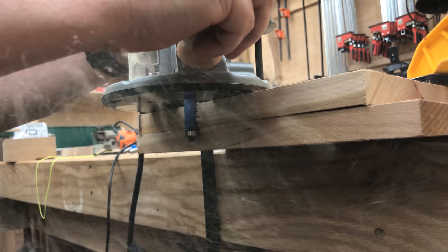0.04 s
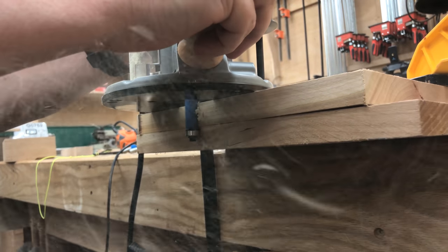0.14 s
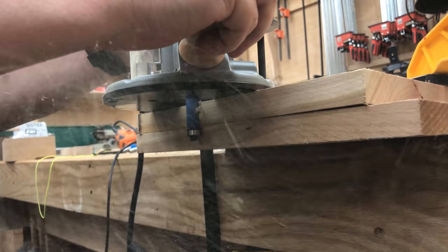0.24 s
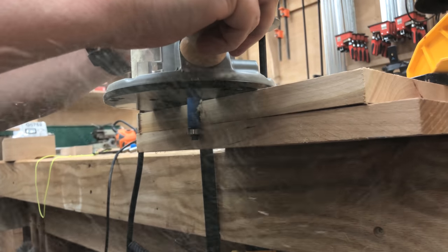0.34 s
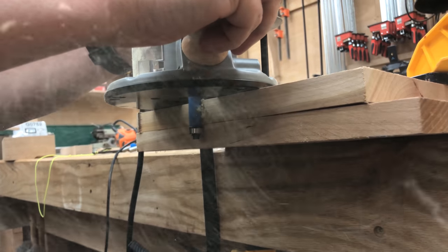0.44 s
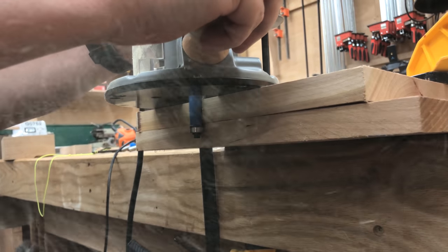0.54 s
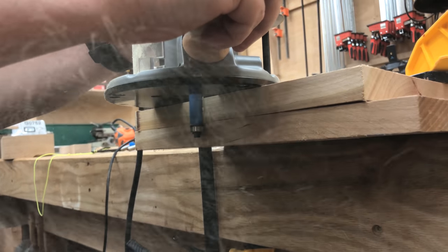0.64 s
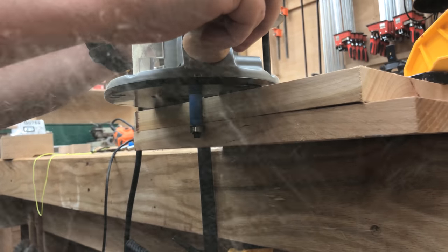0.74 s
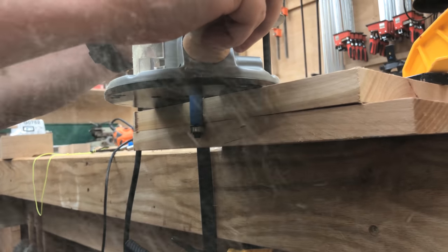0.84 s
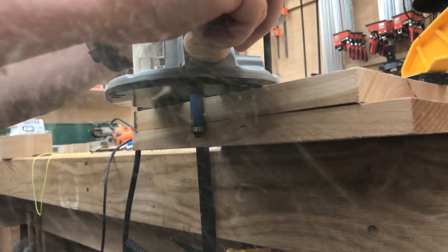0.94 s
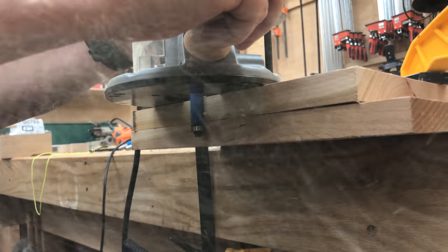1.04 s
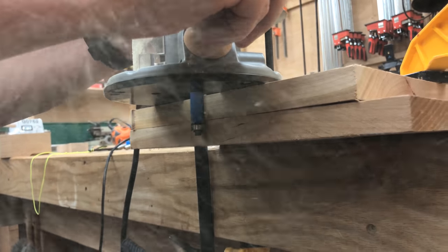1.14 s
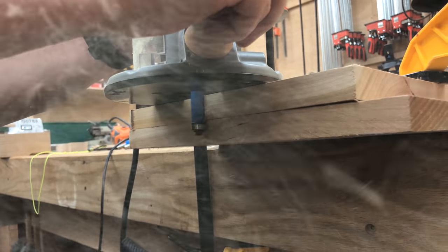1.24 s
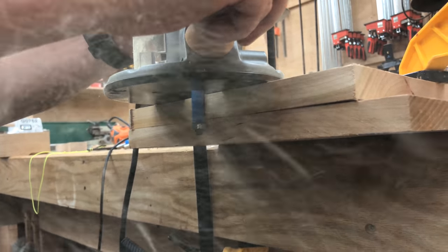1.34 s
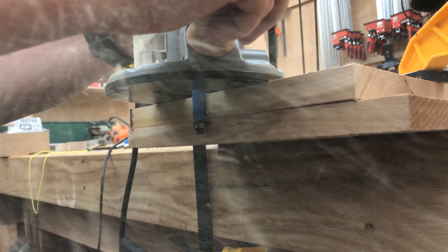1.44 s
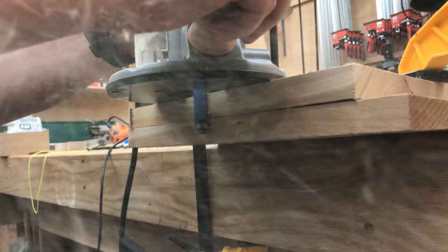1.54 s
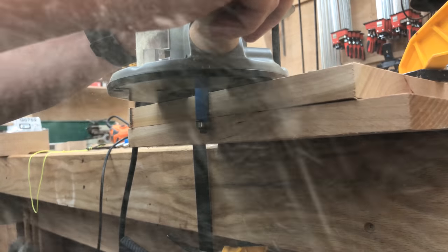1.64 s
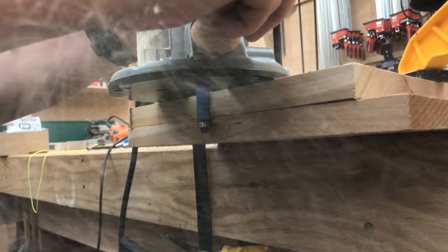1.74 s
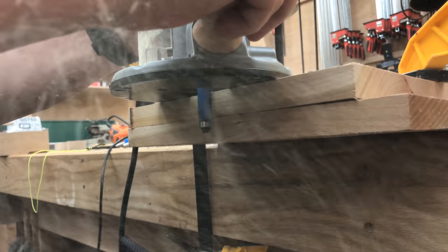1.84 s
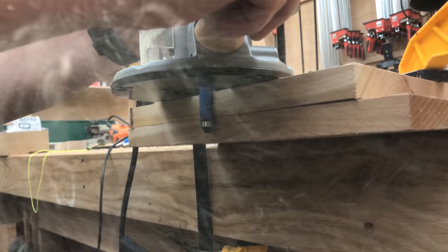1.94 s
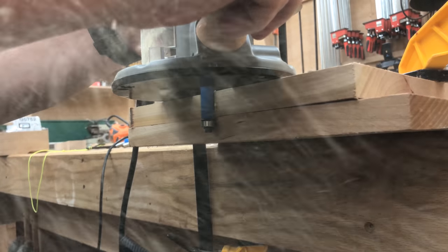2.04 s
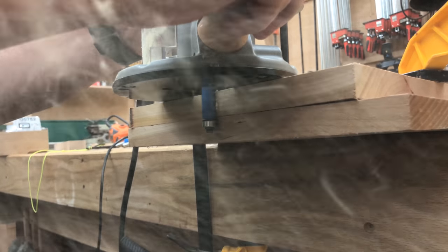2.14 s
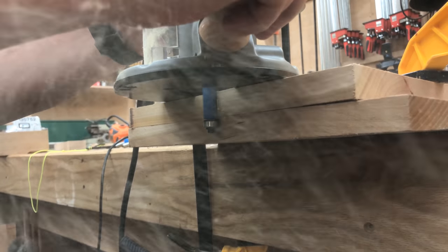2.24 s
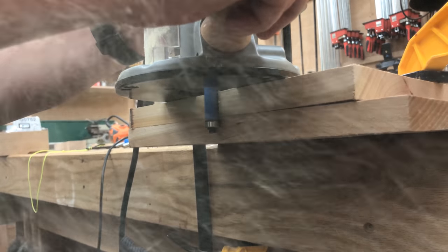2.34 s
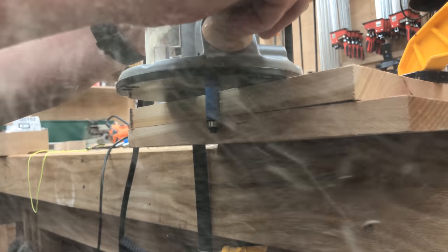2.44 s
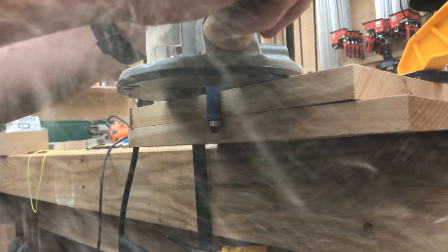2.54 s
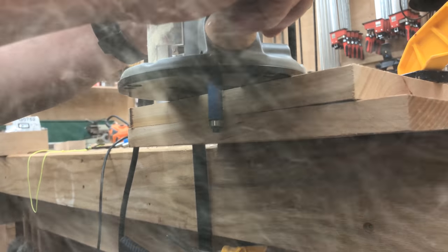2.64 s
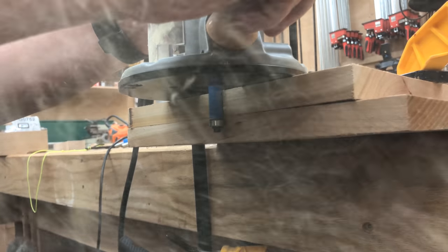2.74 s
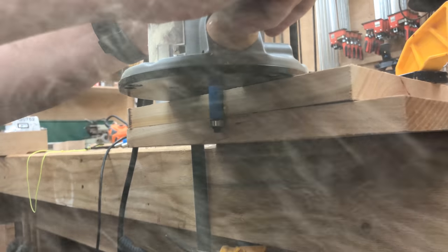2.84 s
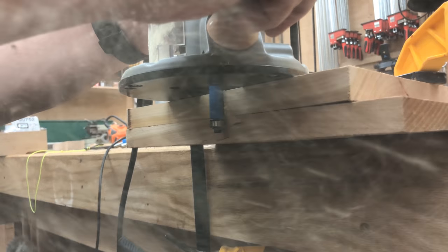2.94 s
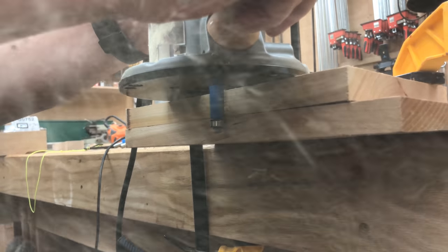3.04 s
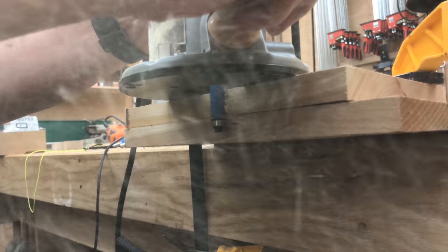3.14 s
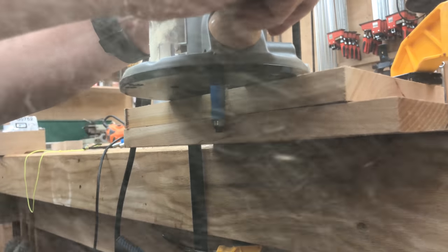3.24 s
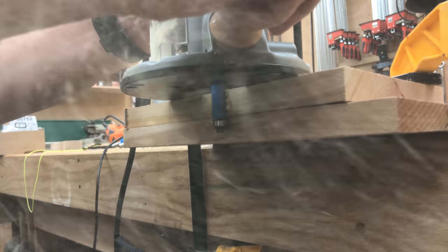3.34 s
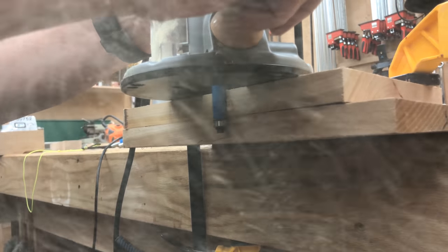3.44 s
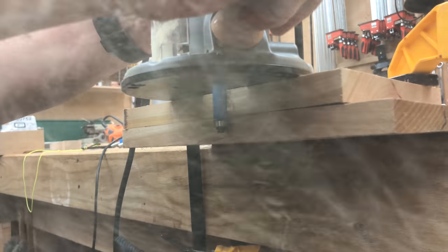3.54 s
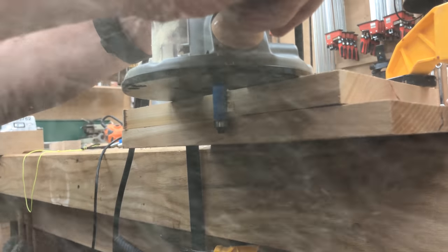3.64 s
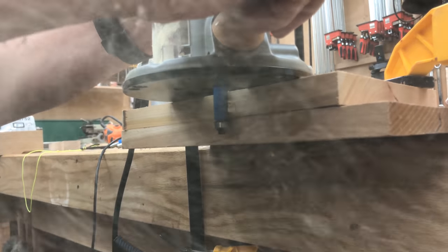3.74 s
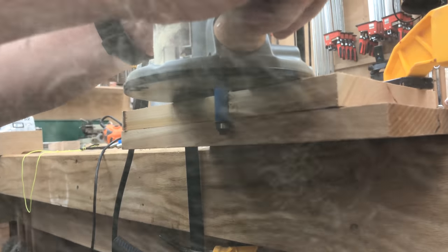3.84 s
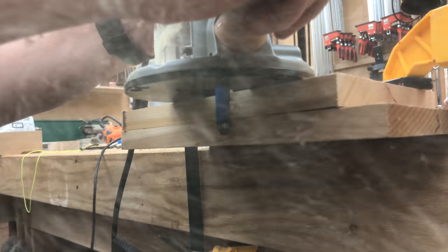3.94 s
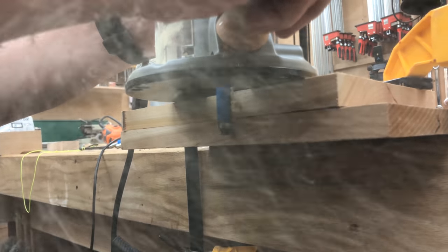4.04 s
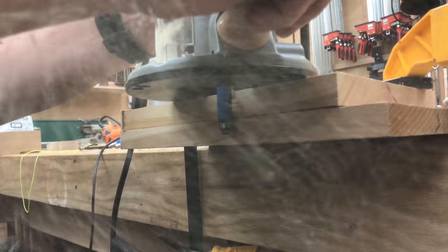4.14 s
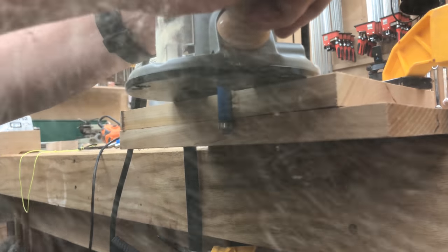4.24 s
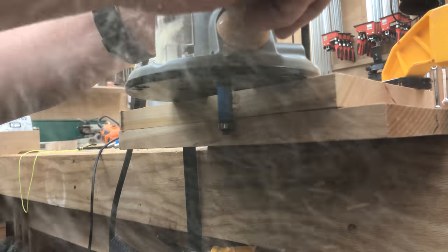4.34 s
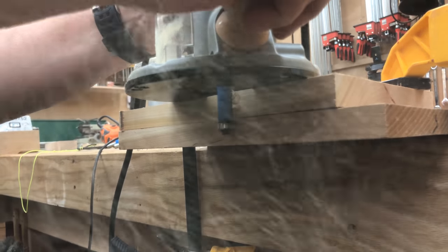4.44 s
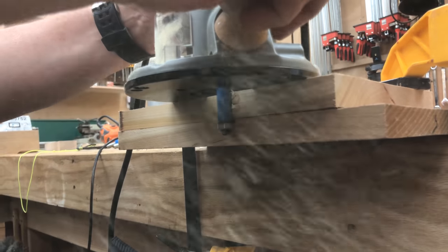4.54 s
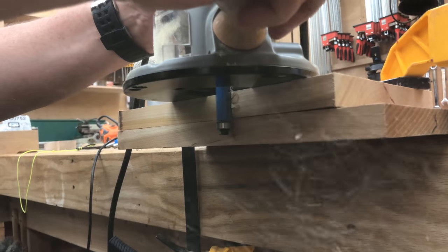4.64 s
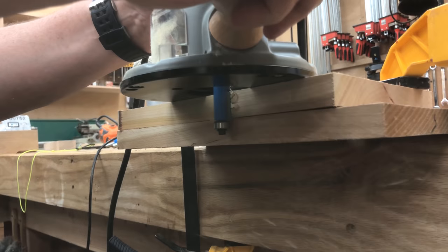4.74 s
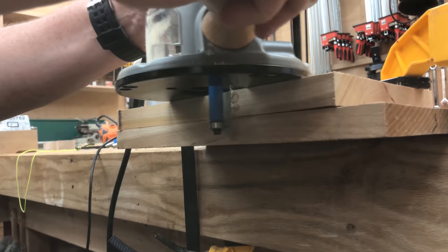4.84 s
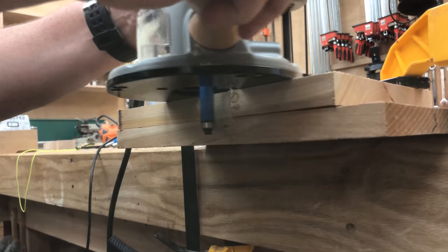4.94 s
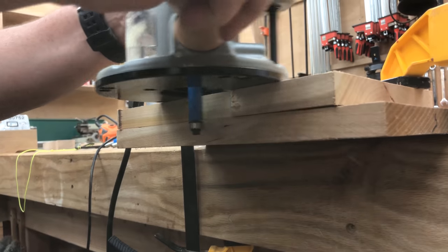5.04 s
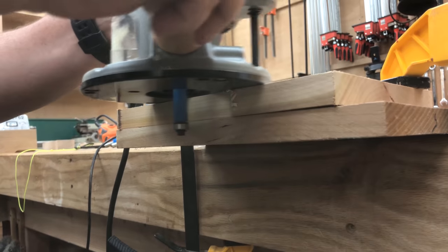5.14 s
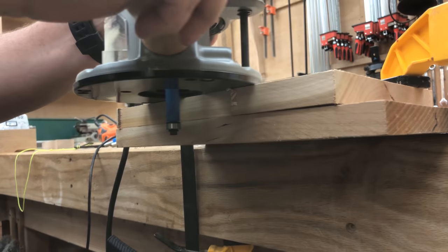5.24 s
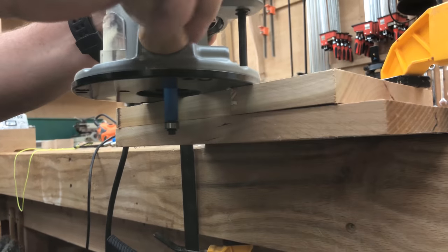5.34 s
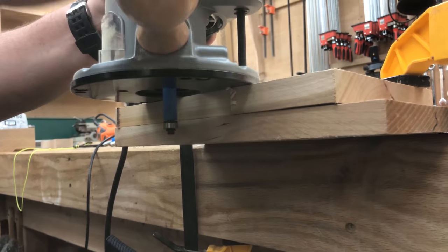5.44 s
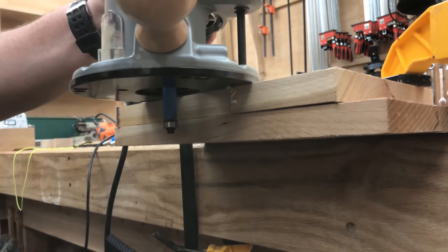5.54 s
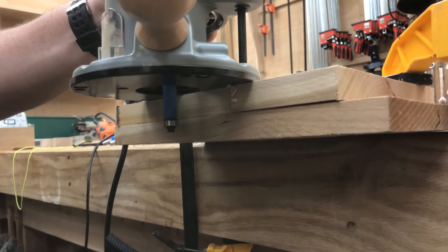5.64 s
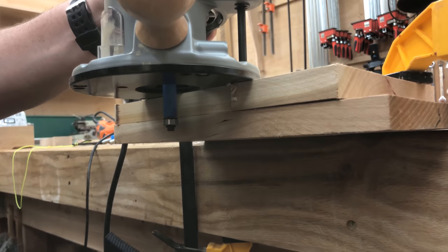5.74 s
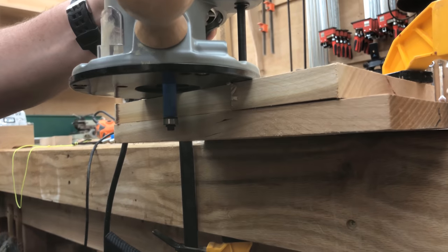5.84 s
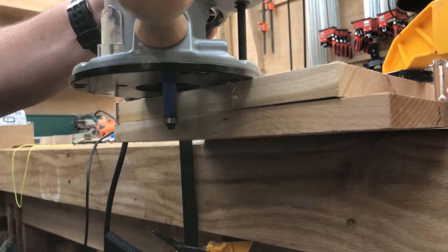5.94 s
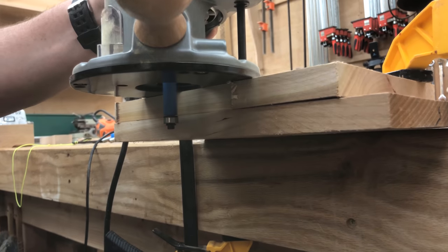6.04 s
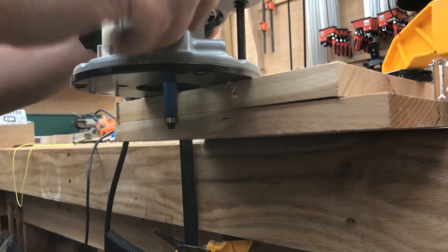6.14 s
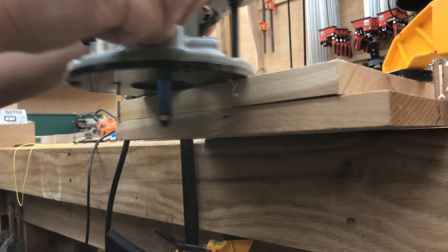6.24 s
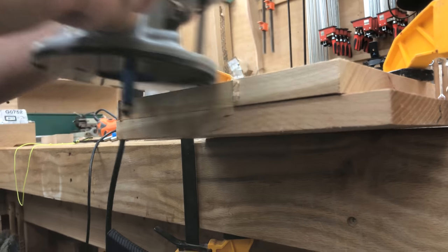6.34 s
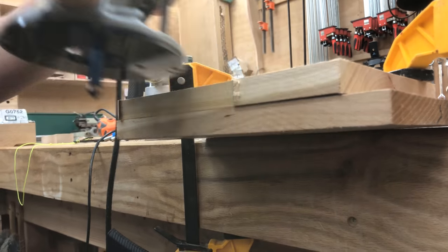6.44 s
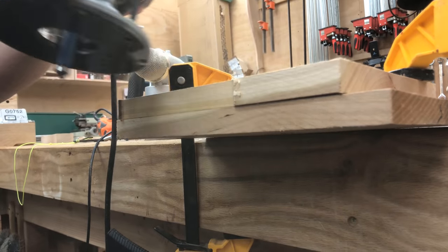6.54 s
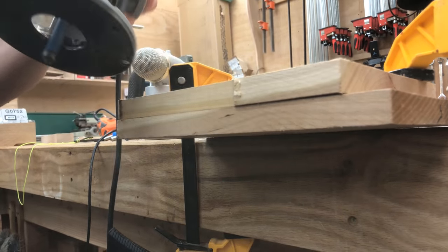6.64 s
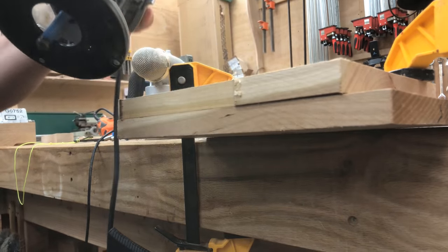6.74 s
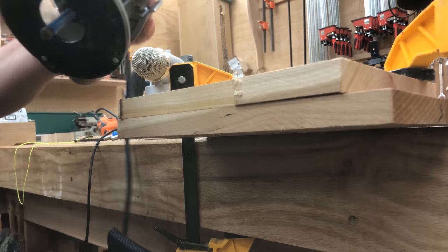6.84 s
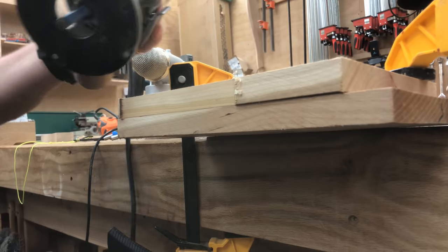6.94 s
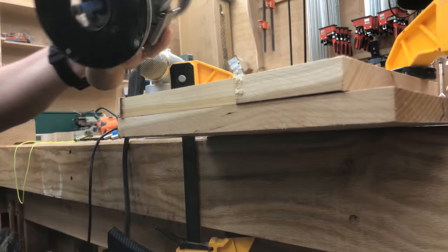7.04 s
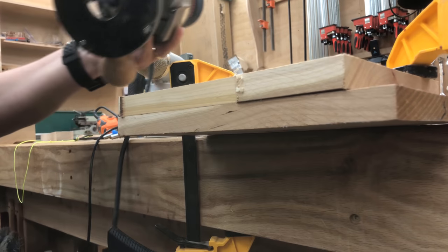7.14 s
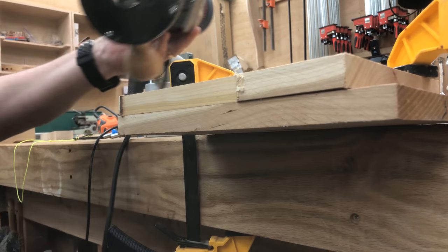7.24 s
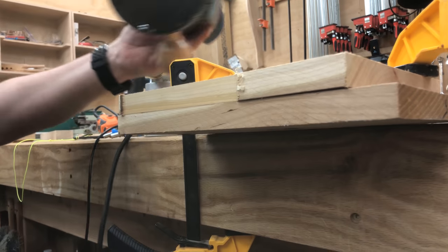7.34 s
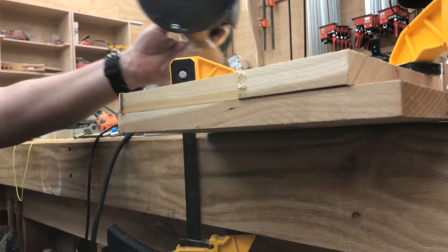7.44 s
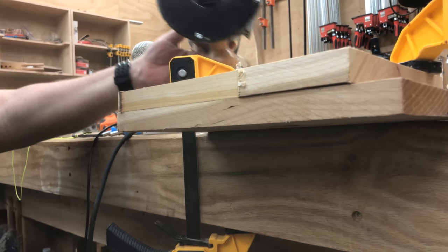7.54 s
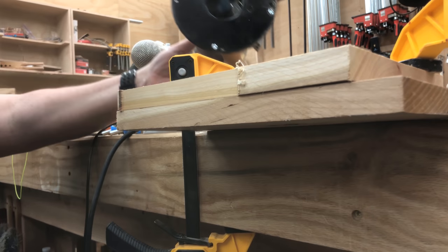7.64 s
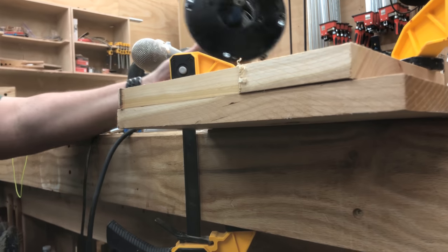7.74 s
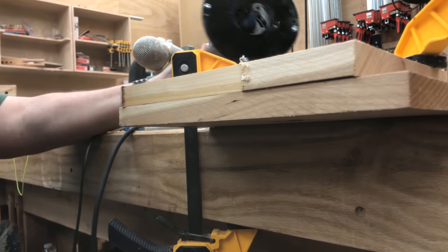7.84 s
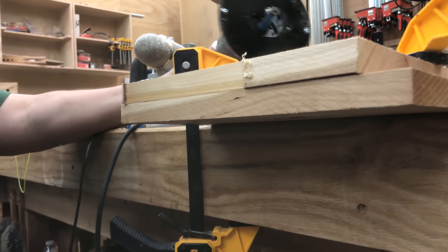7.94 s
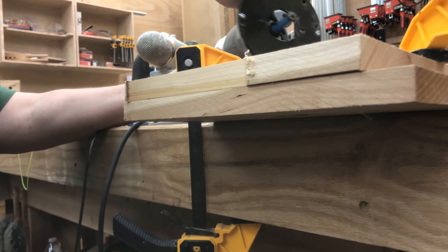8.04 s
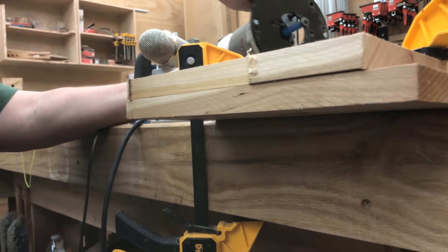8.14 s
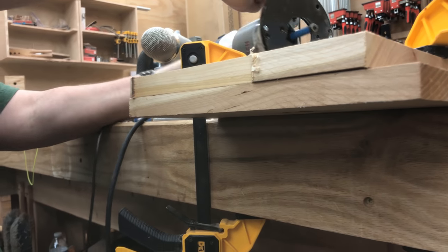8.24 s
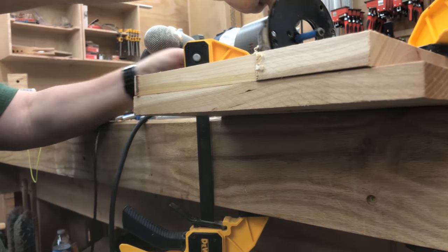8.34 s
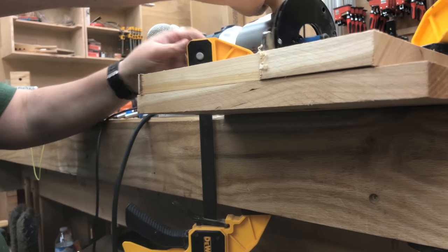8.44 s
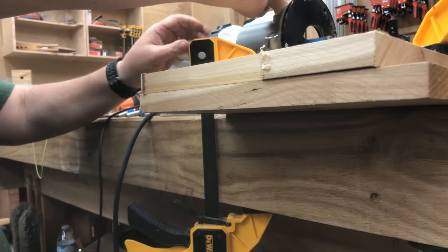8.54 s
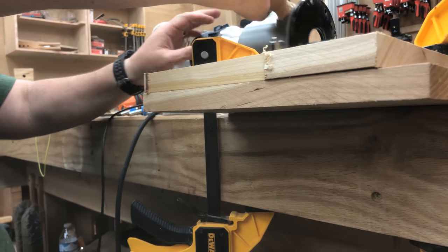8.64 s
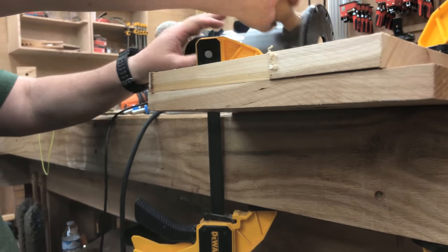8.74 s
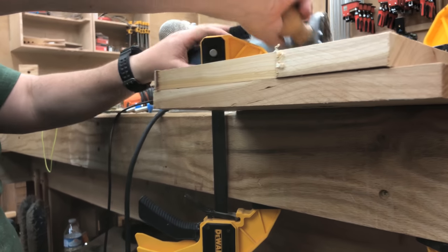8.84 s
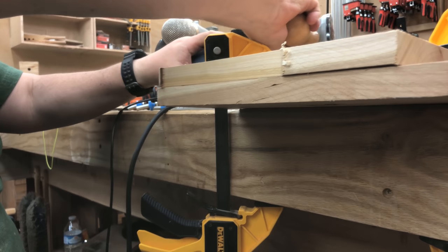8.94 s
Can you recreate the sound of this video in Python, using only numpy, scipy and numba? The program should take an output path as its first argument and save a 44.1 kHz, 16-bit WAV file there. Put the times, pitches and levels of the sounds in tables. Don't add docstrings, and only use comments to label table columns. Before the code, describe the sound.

In a workshop, a router trims a board edge very close to a single overloaded microphone: a steady, harsh, gritty buzz-whine with roaring air. The pitch lifts slightly as the bit leaves the wood and the tone smooths out. Switched off, it glides downward while hollow resonances shift as the tool is turned, then small taps and a firmer wooden knock as it is laid on the bench.

```python
import sys
import numpy as np
from scipy import signal
from scipy.fft import rfft, irfft, next_fast_len
from scipy.io import wavfile
from scipy.ndimage import uniform_filter1d
from numba import njit

SR = 44100
rng = np.random.default_rng(int(sys.argv[2]) if len(sys.argv) > 2 else 0)


def nominal_scale(level):
    x = np.asarray(level, float) / 20
    return 10 ** x


def dump_mix(stems):
    frames = np.atleast_2d(stems).T
    limited = np.clip(frames, -1, 1)
    pcm = np.round(limited * 32767).astype(np.int16)
    wavfile.write(sys.argv[1], SR, pcm)


N = 396439
TIME_S = np.arange(N) / SR
CUT_EASES_S, OUT_OF_WOOD_S, FREE_S, SWITCH_OFF_S, LIFT_OFF_S = 3.93, 4.52, 4.96, 5.741, 6.32


def curves(table):
    time_s, *columns = np.transpose(table)
    return [np.interp(TIME_S, time_s, column) for column in columns]


def walk(rate_hz):
    hold = int(SR / rate_hz)
    steps = np.repeat(rng.standard_normal(N // hold + 1), hold)
    slewed = uniform_filter1d(uniform_filter1d(steps, hold), hold)
    return 1.294 * slewed[:N]


def swell(start_s, end_s):
    progress = np.clip((TIME_S - start_s) / (end_s - start_s), 0, 1)
    return np.abs(np.sin(np.pi * progress))


def noise(shape):
    freq_hz, shape_db = np.transpose(shape)
    size = next_fast_len(N)
    bin_hz = np.arange(size // 2 + 1) * SR / size
    gain = nominal_scale(np.interp(np.log(bin_hz + 1), np.log(freq_hz), shape_db))
    x = irfft(rfft(rng.standard_normal(size)) * gain, size)[:N]
    return x / np.std(x)


@njit
def band(x, center_hz, width):
    y, b, l = np.empty(len(x)), 0., 0.
    for i in range(len(x)):
        g = np.tan(np.pi * center_hz[i] / SR)
        v = (b + g * (x[i] - l)) / (1 + g * (g + width))
        b, l, y[i] = 2 * v - b, l + 2 * g * v, width * v
    return y


def hiss(center_hz, width):
    once = band(rng.standard_normal(N), center_hz, width)
    twice = band(once, center_hz, width)
    return twice / np.std(twice)


# time_s, speed_hz
SPEED = [(0, 420.4), (.6, 422.6), (1.2, 422), (1.5, 423.6), (1.8, 423.6), (2.1, 426.3), (3, 425.3),
         (3.3, 424), (3.6, 424.7), (3.9, 425.5), (4.35, 430), (4.65, 438.8), (4.8, 439.2), (5.4, 434.6),
         (5.74, 434)]


def shaft_hz():
    equal_drag_hz, drag_per_s = 283.2, .1028
    driven_hz, = curves(SPEED)
    off_s = np.maximum(TIME_S - SWITCH_OFF_S, 0)
    return equal_drag_hz * np.tan(np.arctan(driven_hz / equal_drag_hz) - drag_per_s * off_s)


PARTIAL_STAGES = {"unbalance": (-32, -30, -27.5, -32.5, -56.5), "flutes": (-25, -25.5, -47, -34.5, -47),
                  "fan": (-38, -48, -44, -44, -49), "balls": (-40.5, -39, -28.5, -27, -38.5),
                  "balls+2": (-45, -53, -48, -50.5, -45.5), "balls+4": (-55, -53, -55, -58, -55.5),
                  "balls+1": (-52, -52, -48, -51, -49), "x3": (-24, -22, -34, -39.5, -56),
                  "x4": (-39.5, -36, -40, -44, -52.5), "x5": (-43, -36.5, -37, -47, -58),
                  "x6": (-31, -39.5, -52, -49, -57), "x8": (-33, -35, -49, -56, -60)}
AIR_STAGES = {"rumble": (-46, -46, -46, -45.5, -49), "roar": (-29, -32.5, -28, -27, -28),
              "fizz": (-34, -35, -31, -30, -31), "vent": (-28, -33.5, -28.5, -30, -35.5)}
RESONATING = {"unbalance": [(-.3, .3, 5.5), (.6, 1.3, 1.5), (5.2, 5.8, 2), (5.8, 6.55, 6), (7, 8, 6.5)],
              "flutes": [(1.3, 1.7, 2), (6.1, 6.8, 4), (.7, 1.1, 2), (5.7, 6.1, 12.5), (7.2, 7.85, -4),
              (7.5, 9.4, 15.5), (8.6, 8.97, 7)], "fan": [(2.6, 3.25, 11), (3.95, 4.3, 7), (4.35, 5.2, 13),
              (5.3, 6.2, 5), (6.35, 6.95, 17), (6.9, 7.45, 11), (7.9, 8.7, 6)], "balls": [(-.3, .9, 3),
              (1.3, 2, 4), (4, 4.7, 5), (5.35, 6.15, 4.5), (6.2, 6.6, 4), (6.5, 7.2, 6), (7, 7.4, 5),
              (8.5, 8.95, 3.5)], "balls+2": [(.2, 1.5, 7), (3, 4.1, 5), (5.8, 6.6, 12), (7, 7.4, 9),
              (7.5, 8.2, 12.5), (8, 8.85, 17.5)], "balls+4": [(5.8, 6.2, 10), (8.4, 8.9, 24.5)],
              "balls+1": [(4.5, 4.8, 12), (7.2, 7.9, 12), (8, 8.6, 9)]}
GRAIN = {"x3": [(-.3, .3, -4), (4.2, 4.6, 3), (2, 3.4, 1), (5.8, 6.35, -9), (6.25, 6.7, 8),
         (6.8, 7.6, 10.5), (8, 8.4, 12)], "x4": [(-.3, .3, 13), (.4, 1.5, -12), (6.25, 7, 11),
         (8, 9.1, 16)], "x5": [(.7, 1.6, 5), (2, 4.7, 7.5), (5.5, 6.4, 4.5)], "x6": [(.7, 1.9, -17),
         (1.5, 1.9, -8), (2.6, 3.6, -9), (3.8, 4.6, -10), (6.2, 6.6, 11)], "x8": [(.1, .4, 2),
         (1.1, 1.7, -9), (2.1, 3.2, 0.5), (3.1, 3.8, -12), (3.9, 4.5, -9), (6.8, 7.2, 14)]}
SHADING = {"rumble": [(2.1, 2.7, 3), (8.2, 9.3, 12.5)], "roar": [(2.2, 3.6, 2), (4.35, 4.8, 2),
           (4.8, 5.7, -2), (5.75, 6.1, -2), (6.8, 7.1, 2), (7.8, 8.1, -2)], "fizz": [(1.9, 3.6, -0.5),
           (5.8, 6.5, -2), (6.6, 7.1, 2), (7.2, 7.8, 2), (7.8, 8.2, -2)], "vent": [(1.6, 2.4, -2.5),
           (2.2, 3.1, 1.5), (6.7, 7.4, 1.5), (8, 8.4, -3)]}


def layer_db(name):
    start_db, easing_db, free_db, lifted_db, last_db = (PARTIAL_STAGES | AIR_STAGES)[name]
    stages = [(0, start_db), (CUT_EASES_S, easing_db), (FREE_S, free_db), (SWITCH_OFF_S, free_db),
              (LIFT_OFF_S, lifted_db), (N / SR, last_db)]
    total_db, = curves(stages)
    for start_s, end_s, swell_db in (RESONATING | GRAIN | SHADING)[name]:
        total_db = total_db + swell_db * swell(start_s, end_s)
    return total_db


def line(turns, multiple, level_db, drift=0.11, jitter=0.061, flutter_db=0.44):
    lag_turns = .74 - .205 * multiple ** 2
    wander = drift * walk(1.51) + jitter * walk(40)
    phase = 2 * np.pi * (multiple * turns + lag_turns) + wander
    return np.sqrt(2) * nominal_scale(level_db + flutter_db * walk(14)) * np.sin(phase)


def treble_flecks():
    out, hold = 0, 1024
    for center_hz in 4700 * 1.194 ** np.arange(7):
        gate = np.repeat(rng.random(N // hold + 1) < .012, hold)[:N]
        edges = [(center_hz * .87, -90), (center_hz * 0.885, 0), (center_hz * 1.12, 0), (center_hz * 1.13, -90)]
        out = out + nominal_scale(-41) * noise(edges) * uniform_filter1d(1. * gate, hold)
    return out * np.array([[1], [-1]])


# start_s, peak_db, crack_db
KNOCKS = [
    (8.095, -38, -20),
    (8.485, -24, -12),
    (8.51, -38, -12),
    (8.535, -28, -12),
    (8.58, -36, -12),
    (8.921, -17, 6.5),
    (8.945, -23, -8),
    (8.955, -17, -6),
    (8.98, -23, -8),
]
# pitch_hz, level_db, t60_s
BENCH_MODES = [(85.5, -9.5, 0.19), (163, 2.5, 0.11), (238, -9, 0.059), (383, 0, 0.044)]


def bench():
    out, t = np.zeros(N + SR), np.arange(SR // 2) / SR
    push = np.minimum(t / .003, 1)
    for start_s, peak_db, crack_db in KNOCKS:
        blow = nominal_scale(crack_db) * np.sin(2 * np.pi * 790 * t) * 1000 ** (-t / 0.041)
        for pitch_hz, level_db, t60_s in BENCH_MODES:
            gain = nominal_scale(level_db + 2 * rng.standard_normal())
            blow = blow + gain * np.sin(2 * np.pi * pitch_hz * t) * 1000 ** (-t / t60_s)
        first = int(start_s * SR)
        out[first:first + len(t)] += nominal_scale(peak_db) * push * blow
    return out[:N]


# start_s, end_s, first_hz, last_hz, level_db
HOLLOWS = [
    (4.2, 6.8, 2080, 2069, -38.5),
    (6.1, 6.9, 1394, 1270, -31.5),
    (6.65, 7.2, 3854, 3768, -35.5),
    (7.3, 7.9, 1204, 1753, -38),
    (7.6, 8.3, 7910, 8710, -40),
    (8.55, 9.2, 8300, 8200, -46),
    (8.4, 8.9, 3400, 3150, -35),
    (8.86, 9.06, 750, 1106, -32),
]
# start_s, end_s, first_hz, last_hz, level_db
GAPS = [
    (6.8, 7.8, 2570, 2380, -32),
    (6.9, 9.06, 453, 520, -35.5),
]


def hollows():
    out = 0
    for table, width in ((HOLLOWS, .12), (GAPS, 0.5)):
        for start_s, end_s, first_hz, last_hz, level_db in table:
            center_hz = np.interp(TIME_S, (start_s, end_s), (first_hz, last_hz))
            gain = nominal_scale(level_db + 1.2 * walk(12))
            out = out + gain * swell(start_s, end_s) * hiss(center_hz, width)
    return out


# time_s, low_hz, high_hz, high_minus_low_db
VENT = [(0, 6500, 8140, 0), (2, 6400, 8400, -0.5), (4.2, 6270, 8000, -0.5), (5, 6075, 7790, 0.5),
        (6, 6130, 8160, -3.5), (6.8, 6257, 7653, -8), (7.3, 6080, 7300, 3), (7.7, 6050, 7940, 8),
        (8.1, 6186, 8690, 9), (8.5, 7000, 8200, -3), (8.99, 7020, 8000, 0)]
# freq_hz, density_db_per_hz
ROAR = [(60, -32), (250, -12), (400, -8), (700, -2.5), (1200, 0), (1700, -3), (2300, -4.5), (3000, -22)]
# freq_hz, density_db_per_hz
FIZZ = [(1800, -22.5), (2500, -0.5), (3800, -0.5), (4500, -5), (9000, -6), (12000, -11.5), (15500, -22),
        (20000, -41)]


def air(turns):
    low_hz, high_hz, tilt_db = curves(VENT)
    vent = nominal_scale(-tilt_db / 2) * hiss(low_hz, 0.33) + nominal_scale(tilt_db / 2) * hiss(high_hz, 0.38)
    vent = vent * nominal_scale(layer_db("vent") - 4.5 + .9 * walk(14))
    rumble = noise([(20, -3), (200, -5), (400, -23)]) * nominal_scale(layer_db("rumble") - 5)
    roar = noise(ROAR) * nominal_scale(layer_db("roar") + 1.1 * walk(9))
    fizz = noise(FIZZ) * nominal_scale(layer_db("fizz") + 1.1 * walk(9))
    puff = 1 + 0.17 * np.sin(2 * np.pi * turns)
    return rumble + roar + puff * (fizz + vent)


# start_s, end_s, multiple, level_db
PASSING = [
    (8, 9.6, 12, -39),
    (6.9, 7.4, 12, -41),
    (8.55, 8.87, 7.23, -34),
    (8.75, 9, 9.615, -42),
    (8.1, 9.1, 24, -45),
    (5.8, 6.5, 6.23, -44),
]


def bearing(turns, cutting):
    balls = 3.615
    out = cutting * line(turns, balls - 3, -48.5, jitter=.4, flutter_db=4)
    for extra, name in ((0, "balls"), (2, "balls+2"), (4, "balls+4"), (1, "balls+1")):
        out = out + line(turns, balls + extra, layer_db(name), jitter=0.099, flutter_db=1.5)
    for start_s, end_s, multiple, level_db in PASSING:
        out = out + swell(start_s, end_s) * line(turns, multiple, level_db, jitter=.15)
    return out


def rotor(turns):
    unbalance = line(turns, 1, layer_db("unbalance"), flutter_db=0.45)
    flutes = line(turns, 2, layer_db("flutes"))
    fan = line(turns, 18, layer_db("fan"), jitter=.8, flutter_db=3)
    return unbalance + flutes + fan


# start_s, end_s, multiple, level_db
BITE = [(.2, 1.6, 7, -45), (3.7, 4.2, 7, -45), (1.9, 3.6, 9, -47), (-.5, .8, 12, -42), (-1.5, 2.1, 9, -42),
        (3.5, 3.8, 9, -41), (0, 1.6, 10, -43.5), (4.5, 5.1, 10, -50), (2.6, 4.1, 11, -47),
        (1.5, 4.3, 12, -45), (0, 3.6, 13, -39), (1.5, 4.3, 14, -48), (2.4, 3.3, 14, -42),
        (2, 3.76, 17, -43), (0.5, 1.8, 19, -46), (0.5, 2.3, 21, -43), (3, 4.4, 21, -47.5),
        (1.5, 3.6, 22, -42), (1.7, 2.4, 23, -42), (3, 4.4, 23, -44), (1.2, 1.6, 24, -46),
        (0.5, 1.4, 26, -41), (-0.5, 2.4, 30, -45), (2.3, 3.1, 27, -48), (2, 4.6, 29, -48),
        (3.5, 4.2, 31, -49), (.8, 1.8, 20, -46)]


def cutter(turns):
    out = 0
    for multiple in (3, 4, 5, 6, 8):
        overload_share_db = 5 if multiple == 6 else 0
        out = out + line(turns, multiple, layer_db("x" + str(multiple)) - overload_share_db)
    for start_s, end_s, multiple, level_db in BITE:
        tooth = line(turns, multiple, level_db, drift=0.92, jitter=0.16, flutter_db=2.5)
        out = out + np.sqrt(swell(start_s, end_s)) * tooth
    return out


# time_s, level_db
NEARNESS = [(0, 8), (.9, 5), (1.8, 6.5), (2.7, 5.5), (3, 8.5), (4.3, 6.5), (4.62, 3.5), (4.85, 4), (5.6, 3),
            (5.95, 3), (6.4, 0.5), (8.2, -1.24), (8.8, 1.3)]


def scene():
    turns = np.cumsum(shaft_hz() * (1 + 0.000398 * walk(6))) / SR
    cutting = np.clip((OUT_OF_WOOD_S - TIME_S) / 0.26, 0, 1)
    tool = hollows() + air(turns) + bearing(turns, cutting) + rotor(turns) + cutter(turns)
    nearness_db, = curves(NEARNESS)
    return np.tile(nominal_scale(nearness_db) * tool + bench(), (2, 1))


def low_pass(x):
    return signal.sosfilt(signal.butter(12, 16920, fs=SR, output="sos"), x)


def record(dry):
    limit = nominal_scale(-17)
    flat = np.clip(dry, -limit, limit)
    flat = flat - uniform_filter1d(flat, SR // 8)
    lowpass = signal.ellip(10, .2, 70, 15650, fs=SR, output="sos")
    mix = signal.sosfilt(lowpass, flat + treble_flecks())
    return low_pass(mix)


dry = scene()
out = record(dry)
dump_mix(out)
```